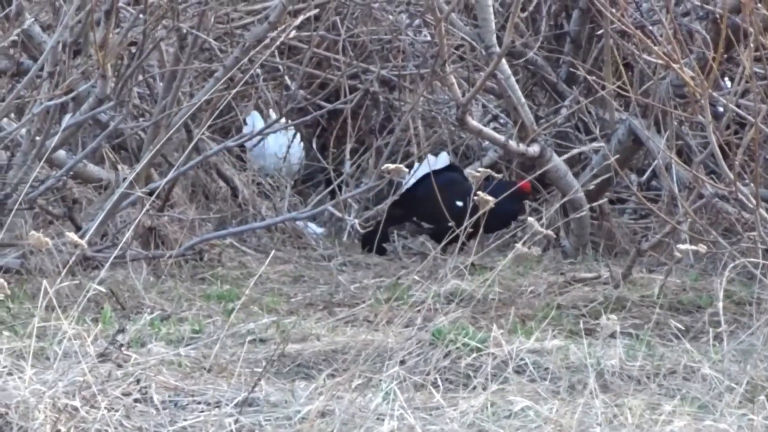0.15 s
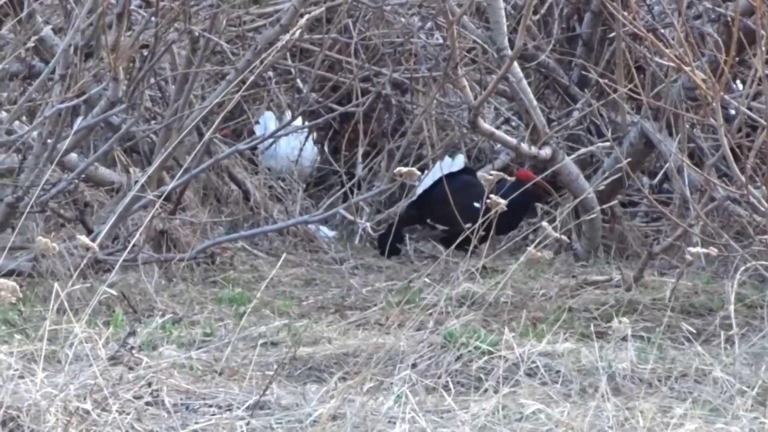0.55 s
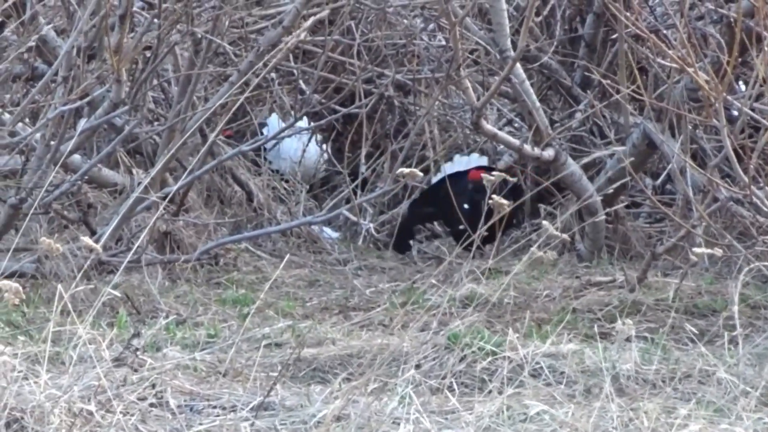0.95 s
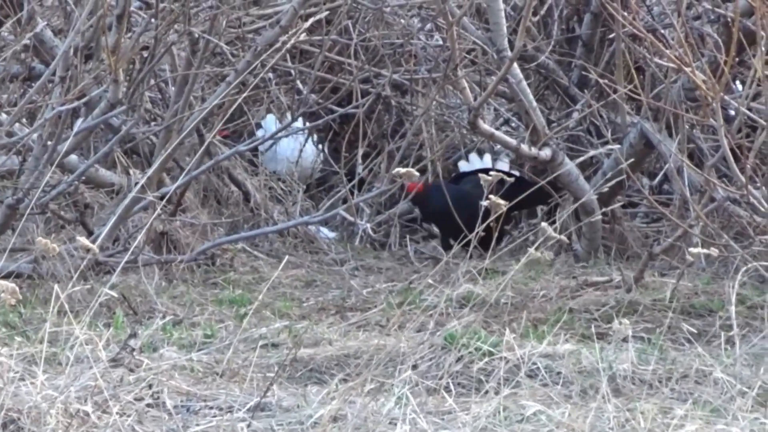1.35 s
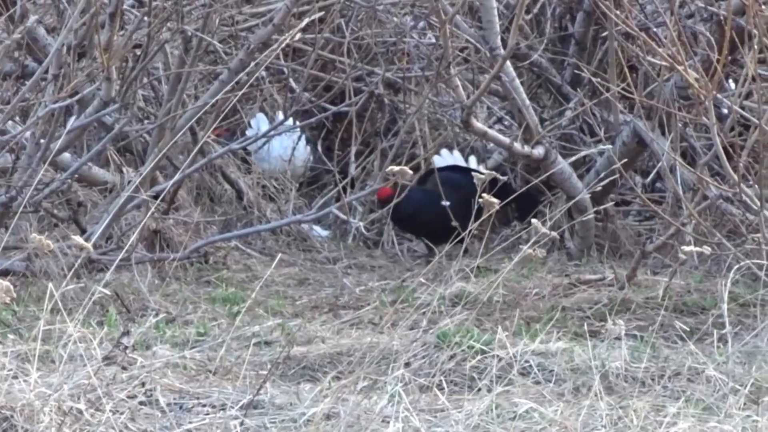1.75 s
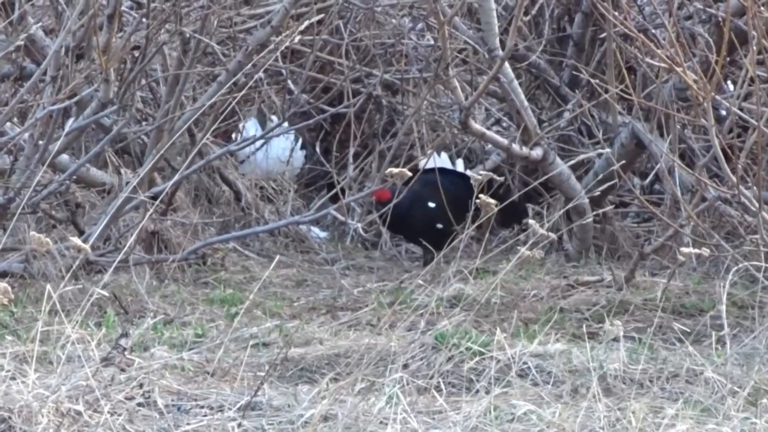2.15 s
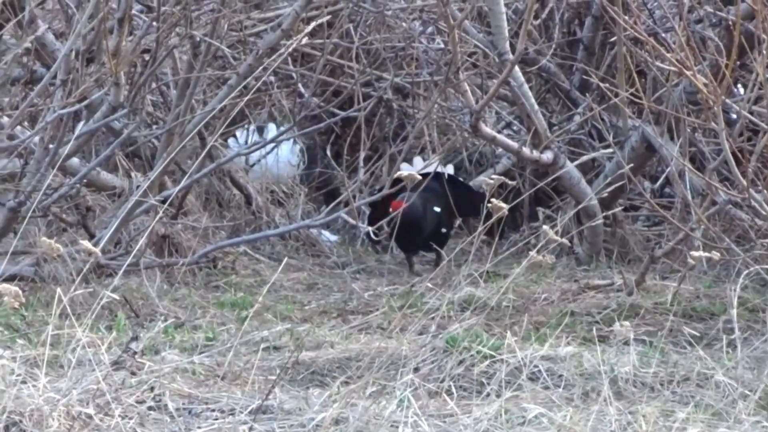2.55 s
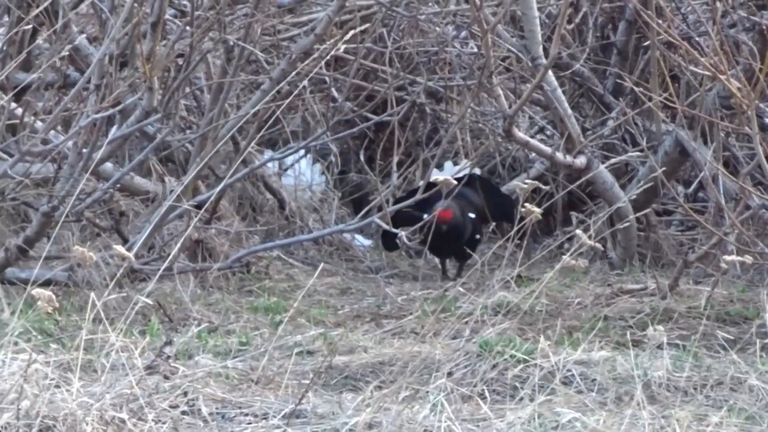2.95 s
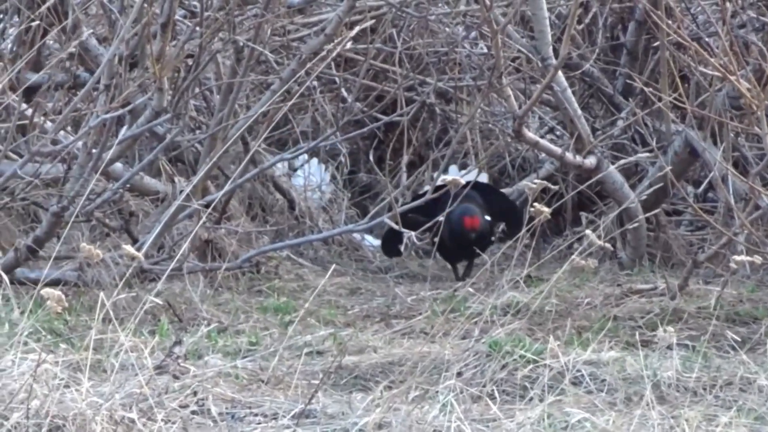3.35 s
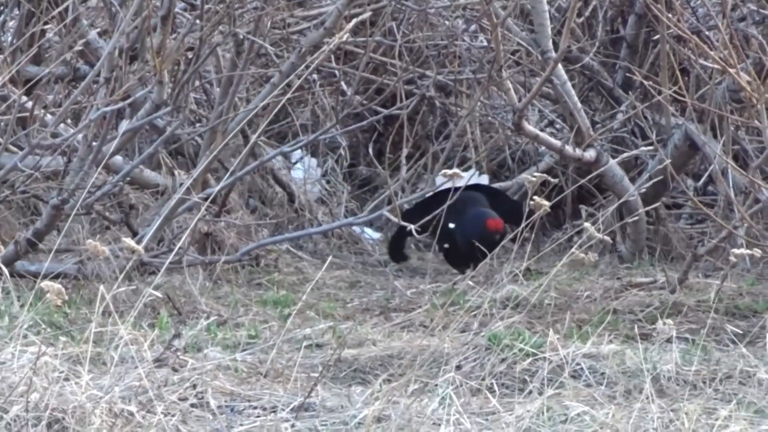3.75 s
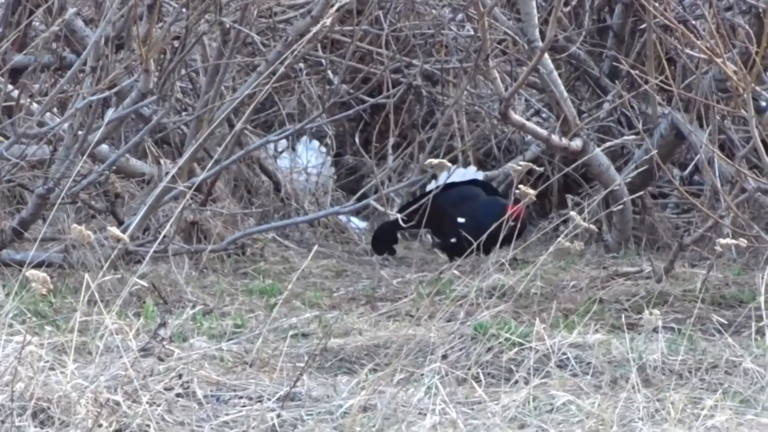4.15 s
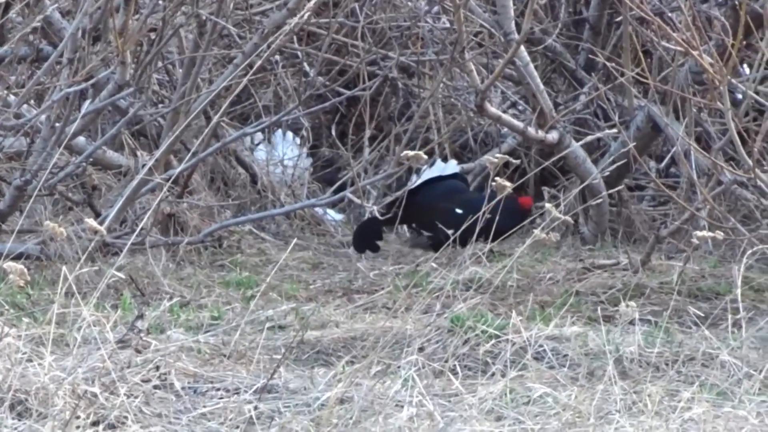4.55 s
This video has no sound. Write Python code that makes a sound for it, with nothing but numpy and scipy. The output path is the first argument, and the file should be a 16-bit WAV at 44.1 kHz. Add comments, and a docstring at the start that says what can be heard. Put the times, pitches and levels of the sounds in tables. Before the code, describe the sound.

Low wind rumble over open grass, a black grouse's bubbling coo swelling up, then thin bright songbird twitters and whistles answering from nearby shrubs.

```python
"""Wind and far chirps come first, with a camera jolt; then a male black grouse rolls and bubbles at the left.
Two songbirds join at the right: one with steep down-strokes, one with falling and held whistles.
All birds are gliding sine notes that the shrubs smear into short clouds of echoes.
Shaped noise makes the wind and the faint hiss, slow pressure swings make the two jolts,
decaying sines make the snaps of dry stalks, and a wavering sine makes the low-level hum."""
import sys
import numpy as np
from scipy import signal
from scipy.fft import rfft, irfft, next_fast_len
from scipy.io import wavfile
from scipy.ndimage import map_coordinates

SR = 44100
rng = np.random.default_rng(int(sys.argv[2]) if len(sys.argv) > 2 else 0)


def to_wav(sig):
    """Store sig (one row per channel, or 1-D mono) as 16-bit WAV at the path in sys.argv[1].

    Samples outside -1..1 are clipped; the rate is SR.
    """
    pcm = np.clip(np.atleast_2d(sig), -1, 1) * 32767
    pcm = np.round(pcm).astype(np.int16)
    wavfile.write(sys.argv[1], SR, pcm.T)  # frames by channels


N = 207925

# Note levels in dB are set before flutter, pan and echoes; pitches in Hz before the quaver.
# Grouse bubbles after the roll: start_s, length_s, middle_hz, glide_hz, peak_db
GROUSE_COOS = [(1.192, .057, 463.5, 27, -27), (1.533, 0.039, 509, 20, -32), (1.558, 0.043, 462, 60, -26.5),
               (1.645, .037, 508, 30, -28), (1.665, 0.054, 471.4, 75, -29),
               (1.719, 0.06, 453.5, -60, -34.5), (1.79, 0.061, 471, 55, -28.5), (1.84, 0.025, 426, -7, -31),
               (1.88, .025, 434, 15, -24.5), (1.924, 0.049, 426, 55, -28), (1.962, .032, 401, -10, -30),
               (1.985, 0.046, 493, -7, -28), (2.04, .06, 470, -20, -38), (2.085, 0.031, 437, 60, -23.5),
               (2.143, 0.039, 488, 41, -38.5), (2.192, 0.07, 438, -15, -29),
               (2.253, 0.065, 476, -17, -26.5), (2.308, 0.045, 431, -15, -28.5),
               (2.371, 0.047, 478, 3, -33.5), (2.395, .039, 482, 107, -30), (2.455, .048, 450.5, 44, -27.5),
               (2.489, 0.033, 510.3, 3, -25.5), (2.525, .046, 473, -43, -24),
               (2.572, 0.038, 456, -42, -26.5), (2.599, 0.023, 479, -12, -26.5),
               (2.659, .037, 442.5, -1, -22.5), (2.705, 0.047, 461, 57, -35),
               (2.871, 0.029, 447, -59, -32.5)]
# Grouse opening roll: strong beats swell, climb and slow down, with a soft low bubble between beats
ROLL_START_S, FIRST_GAP_S, GAP_GROWTH_S = .764, .07, .004  # growth is per beat
ROLL_DB, SWELL_DB, ROLL_HZ, CLIMB_HZ = -37.5, 3.5, 402.7, 11.6  # first beat and its change per beat
BEAT_LENGTH_S, OFFBEAT_LENGTH_S = .027, .051
OFFBEAT_SHARE, OFFBEAT_DB, OFFBEAT_HZ = .43, -8, -38.5  # share of the gap, then level and pitch against the beat
COO_RISE_HZ, COO_SCATTER_HZ = 15, 35  # glide over a roll or murmur note, and the spread of its chance part

# First songbird, steep down-strokes: start_s, length_s, top_hz, bottom_hz, peak_db, pickup_peak_db
DOWN_STROKES = [(1.391, 0.033, 4100, 3150, -47, -62), (1.704, .014, 3920, 2700, -45, -65),
                (1.729, 0.034, 4600, 2580, -33.5, -38), (1.887, .044, 4330, 2830, -33.5, -48),
                (1.961, .038, 4150, 2435, -36.5, -52), (2.088, 0.031, 4086, 2840, -33, -46),
                (2.219, .024, 3740, 2980, -42, -56), (2.269, .05, 4450, 2740, -35.5, -38),
                (2.347, 0.028, 4000, 2710, -36.5, -40), (2.424, 0.017, 4330, 3620, -36, -58),
                (2.443, 0.026, 3620, 2890, -39, -42)]
PICKUP_S, PICKUP_RISE_HZ = .014, 200  # the rising note ahead of a stroke
HEAD_SHARE, TAIL_DB = .66, -10.5  # loud first part of a stroke, then the tail against it
# First songbird, nearly level notes: start_s, length_s, middle_hz, peak_db
WARBLE_NOTES = [(1.832, .022, 3970, -46), (1.846, .031, 3300, -43), (1.866, 0.028, 4050, -43),
                (1.93, 0.021, 2765, -41.5), (1.95, .016, 3530, -44), (1.984, 0.014, 3200, -42),
                (2.035, .014, 3330, -46), (2.062, 0.017, 3700, -42.5), (2.192, .03, 3885, -47),
                (2.24, 0.016, 4100, -37), (2.298, 0.013, 3790, -35), (2.322, 0.031, 4060, -35),
                (2.428, 0.0093, 3650, -37), (2.462, 0.019, 3000, -43.5), (2.475, .016, 3530, -48),
                (2.49, 0.037, 3660, -44), (2.55, 0.051, 3655, -49), (2.61, 0.085, 3600, -53),
                (2.625, 0.077, 3130, -52), (2.68, .05, 4980, -64)]

# Second songbird, falling whistles: start_s, length_s, start_hz, peak_db
FALLING_WHISTLES = [(2.805, .042, 3793, -34), (2.926, 0.042, 3680, -32.5), (2.935, 0.042, 4000, -45.5),
                    (2.994, 0.033, 3645, -37.5), (3.082, 0.044, 3682, -31), (3.142, .058, 3570, -40),
                    (3.2, 0.044, 3610, -48), (3.222, 0.053, 3270, -43), (3.24, 0.025, 3600, -58),
                    (3.52, 0.027, 3430, -45), (3.59, 0.039, 3360, -45.5), (3.605, .045, 3220, -52)]
WHISTLE_FALL_HZ_PER_S = 4200
# Second songbird, held whistles: start_s, length_s, middle_hz, peak_db
HELD_WHISTLES = [(1.165, .045, 4110, -53), (1.335, .045, 3240, -56), (1.432, 0.033, 4015, -52),
                 (3.125, 0.023, 4080, -51.5), (3.495, .02, 4080, -51), (3.01, 0.022, 3900, -43.5),
                 (3.025, .045, 3420, -44), (3.34, 0.056, 3835, -46.5), (3.352, 0.046, 3410, -42),
                 (3.4, 0.035, 3790, -39.5), (3.405, 0.053, 3395, -47), (3.44, 0.07, 3133, -43.5),
                 (3.437, 0.029, 3800, -46), (3.48, .016, 3870, -48), (3.535, .054, 3810, -49.5)]

# Falling chirps of far birds: start_s, length_s, start_hz, peak_db
DISTANT_CHIRPS = [(.17, 0.13, 3460, -59.5), (.31, .028, 3180, -57), (.42, 0.052, 3290, -60),
                  (.695, .022, 3210, -55), (.83, 0.016, 2810, -55), (.91, 0.022, 2760, -57.5),
                  (4.245, 0.023, 3570, -56), (4.26, .017, 3020, -58), (4.515, .019, 3450, -58)]
FAR_FALL_HZ_PER_S = 6000
# Low far calls: start_s, length_s, start_hz, end_hz, peak_db
DISTANT_LOW_CALLS = [(4.55, 0.098, 1358, 1294, -53), (4.665, .045, 1290, 1250, -57)]

# Dry stalks snapping: start_s, pitch_hz, level_db
STALK_SNAPS = [(2.517, 5570, -37), (3.845, 12000, -50), (3.928, 13500, -37), (4.525, 2600, -37)]

# Camera swinging on its mount: crest_s, level_db
CAMERA_JOLTS = [(.33, -5.3), (3.405, -4.8)]
# Pressure pulses within one jolt: from_crest_s, width_s, share (signed, no unit)
JOLT_PULSES = [(-.068, .022, -.7), (0, .026, 1), (.11, .06, -.35)]
# Colour of the brush on the camera body: pitch_hz, relative_level_db (per Hz)
BRUSH_COLOUR = [(60, -40), (120, -10), (270, 3), (400, -1.5), (700, -60), (2000, -120)]

# Wind strength over time: time_s, level_db
WIND_STRENGTH = [(0, -23.5), (.38, -18.5), (.65, -25), (1.0, -21.5), (1.69, -19.5), (1.86, -16),
                 (1.98, -24.5), (3.19, -20), (3.36, -20), (3.53, -21.5), (4.28, -20), (4.71, -22.5)]
# Colour of the buffeting: pitch_hz, relative_level_db (per Hz)
WIND_COLOUR = [(1, -17), (3, 7), (16, 3.5), (30, 0), (45, -7.5), (62, -18), (110, -26.5), (220, -36.5),
               (400, -46.5), (1500, -110)]
# Tilt of the buffeting between the ports: pitch_hz, left_over_right_db
WIND_LEAN = [(5, 0), (11, -4), (18, 0), (35, 5), (70, 1)]
# Likeness of the two ports in wind before the lumps: pitch_hz, correlation (-1 to 1)
WIND_LIKENESS = [(4, 0.62), (13, 0.17), (32, -0.5), (80, -0.019)]
PORT_LIMIT = .63  # ceiling of the diaphragm swing, full scale = 1

# Colour of the distant rush and microphone hiss: pitch_hz, relative_level_db (per Hz)
AIR_COLOUR = [(35, -8), (60, 0.5), (163, -4), (248, -7.5), (413, -8.5), (628, -16), (705, -18.5),
              (1550, -25), (1960, -28.5), (15500, -36.5)]
# Likeness of left and right in the air: pitch_hz, correlation (-1 to 1)
AIR_LIKENESS = [(80, -.3), (200, .1), (600, .3), (1500, .12), (6000, .02)]
AIR_LEVEL_DB = -39.5
# Centre of the wavering hum: pitch_hz, peak_db
HUM_TONE = (689, -56.5)

INPUT_OFFSET, BAND_LIMIT_HZ = -.01, 15780


def grouse():
    """The grouse's low gliding notes: an opening roll, loud bubbles and a soft murmur among them."""
    murmur = chatter(count=16, from_s=1.25, to_s=2.95, mean_s=.04, low_hz=430, high_hz=490, db=-41)
    coos = gliding([*roll(count=6), *murmur], COO_RISE_HZ, COO_SCATTER_HZ)
    coos += [(s, length, hz - glide / 2, hz + glide / 2, db) for s, length, hz, glide, db in GROUSE_COOS]
    return song(coos, pan_db=2.4, round_top=1.2, quaver_hz=9, flutter_db=1, rate=70,
                twig_db=-20, echo_db=-13, t60=.3, delay=.02)


def roll(count):
    """Beats that swell, climb and slow down, with softer, lower offbeats inside the gaps."""
    k = np.arange(count)
    gap = FIRST_GAP_S + GAP_GROWTH_S * k
    start = ROLL_START_S + np.cumsum(gap) - gap
    hz, db = ROLL_HZ + CLIMB_HZ * k, ROLL_DB + SWELL_DB * k
    beats = [(s, BEAT_LENGTH_S, f, d) for s, f, d in zip(start, hz, db)]
    off_start = start + OFFBEAT_SHARE * gap
    offbeats = [(s, OFFBEAT_LENGTH_S, f, d)
                for s, f, d in zip(off_start, hz + OFFBEAT_HZ, db + OFFBEAT_DB)]
    return beats + offbeats[:-1]


def first_songbird():
    """Steep down-strokes and nearly level notes, with soft chance twitter among them."""
    twitter = chatter(count=20, from_s=1.88, to_s=2.56, mean_s=.0156, low_hz=2855, high_hz=3926, db=-49)
    notes = strokes() + gliding(WARBLE_NOTES, scatter_hz=60)
    notes += gliding(twitter, rise_hz=-150, scatter_hz=453)
    return song(notes, pan_db=-2.2, round_top=.6, quaver_hz=62, flutter_db=2.3, rate=260,
                twig_db=-7, echo_db=-6.5, t60=.6, delay=.006)


def strokes():
    """A rising pick-up, then one straight fall in pitch: loud head, soft tail."""
    notes = []
    for s, length, top_hz, bottom_hz, db, pickup_db in DOWN_STROKES:
        head = HEAD_SHARE * length
        knee_hz = top_hz + HEAD_SHARE * (bottom_hz - top_hz)
        notes += [(s - PICKUP_S, PICKUP_S, top_hz - PICKUP_RISE_HZ, top_hz, pickup_db),
                  (s, head, top_hz, knee_hz, db),
                  (s + head, length - head, knee_hz, bottom_hz, db + TAIL_DB)]
    return notes


def second_songbird():
    """Whistles that sag at one speed and others nearly held, with soft chance notes among and after them."""
    above = chatter(count=14, from_s=2.96, to_s=3.28, mean_s=.0139, low_hz=3820, high_hz=4220,
                    db=-57, spread_db=2)
    late = chatter(count=12, from_s=3.45, to_s=3.82, mean_s=.019, low_hz=3220, high_hz=4200, db=-60)
    notes = sagging([*FALLING_WHISTLES, *late], WHISTLE_FALL_HZ_PER_S)
    notes += gliding(above, rise_hz=-120, scatter_hz=200)
    notes += gliding(HELD_WHISTLES, rise_hz=-21, scatter_hz=25)
    return song(notes, pan_db=-2.6, round_top=.38, quaver_hz=25, flutter_db=1.2, rate=160,
                twig_db=-9, echo_db=-8, t60=.7, delay=.03)


def far_birds():
    """Faint falling chirps, chance peeps and two low calls near the centre."""
    peeps = chatter(count=10, from_s=.29, to_s=4.6, mean_s=.019, low_hz=2760, high_hz=3600, db=-63)
    notes = sagging([*DISTANT_CHIRPS, *peeps], FAR_FALL_HZ_PER_S) + DISTANT_LOW_CALLS
    return song(notes, pan_db=.5, round_top=.49, quaver_hz=35.2, flutter_db=1, rate=120,
                twig_db=-6, echo_db=-5.5, t60=.4, delay=.0085)


def song(notes, pan_db, round_top, quaver_hz, flutter_db, rate, twig_db, echo_db, t60, delay):
    """Gliding sines, unsteady in pitch and level; the shrubs return a new dying cloud of echoes for each note."""
    out = np.zeros((2, N + 2 * SR))
    lag = np.arange(SR // 2) / SR
    quaver = quaver_hz * wobble(rate)
    flutter = amp(flutter_db * wobble(rate))
    for s, length, start_hz, end_hz, db in notes:
        at = round(s * SR)
        u = np.arange(int(length * SR)) / int(length * SR)
        hz = start_hz + (end_hz - start_hz) * u + quaver[at:][:len(u)]
        envelope = amp(db) * np.sin(np.pi * u) ** round_top * flutter[at:][:len(u)]
        note = envelope * np.sin(2 * np.pi * np.cumsum(hz) / SR + rng.uniform(0, 2 * np.pi))
        heard = signal.fftconvolve(note[None], shrubs(lag, twig_db, echo_db, t60, delay), axes=1)
        out[:, at:][:, :heard.shape[1]] += heard
    return out[:, :N] * amp([[pan_db / 2], [-pan_db / 2]])  # positive pan leans left


def shrubs(lag, twig_db, echo_db, t60, delay):
    """The direct note, a quick blur from near twigs and ground, and a later decaying cloud of echoes."""
    build_up = 1 - np.exp(-(lag / delay) ** 2)
    echoes = rng.standard_normal((3, len(lag))) * amp(-60 * lag / t60) * build_up
    # part of the echoes reaches both ears alike
    echoes = (1.25 * echoes[:2] + echoes[2]) / np.linalg.norm(echoes[2])
    twigs = rng.standard_normal(len(lag)) * amp(-60 * lag / .055)
    cloud = amp(echo_db) * echoes + amp(twig_db) * twigs / np.linalg.norm(twigs)
    cloud[:, 0] = 1  # the direct sound
    return cloud


def gliding(rows, rise_hz=0, scatter_hz=0):
    """Notes given by their middle pitch, each gliding by a set rise plus a chance part."""
    rises = rise_hz + scatter_hz * rng.standard_normal(len(rows))
    return [(s, length, hz - rise / 2, hz + rise / 2, db)
            for (s, length, hz, db), rise in zip(rows, rises)]


def sagging(rows, hz_per_s):
    """Notes that fall at one speed from their start pitch."""
    return [(s, length, hz, hz - hz_per_s * length, db) for s, length, hz, db in rows]


def chatter(count, from_s, to_s, mean_s, low_hz, high_hz, db, spread_db=3):
    """Soft notes spread loosely over a span, with chance length, pitch and level."""
    u = rng.random((count, 4))
    start = from_s + (to_s - from_s) * (np.arange(count) + u[:, 0]) / count
    length = mean_s * (.5 + u[:, 1])
    hz = low_hz + (high_hz - low_hz) * u[:, 2]
    return np.c_[start, length, hz, db + spread_db * (2 * u[:, 3] - 1)]


def stalks():
    """Dry stalks snap: tiny clicks, each a sine that dies within milliseconds."""
    out, t = np.zeros(N), np.arange(SR // 100) / SR
    for s, hz, db in STALK_SNAPS:
        decay = amp(db - 60 * t / .0038)
        out[round(s * SR):][:len(t)] += decay * np.sin(2 * np.pi * hz * t)
    return out


def camera():
    """Each jolt pulls back, pushes and sags: a slow pressure swing on both ports, led by a dull brush on the body."""
    t = np.arange(N) / SR

    def bell(at, width):
        return np.exp(-((t - at) / width) ** 2 / 2)

    swing = sum(amp(db) * share * bell(s + at, width)
                for s, db in CAMERA_JOLTS for at, width, share in JOLT_PULSES)
    body = unit(filtered(rng.standard_normal(N), lambda hz: amp(along(BRUSH_COLOUR, hz))))
    return swing + amp(-42) * body * sum(bell(s - .07, .03) for s, _ in CAMERA_JOLTS)


def wind():
    """Wind buffets the two microphone ports: lumpy low noise, each port with its own colour."""
    s, db = np.transpose(WIND_STRENGTH)
    lumps = amp(2.5 * np.array([wobble(7.14), wobble(7)]))
    ports = filtered(rush(WIND_COLOUR, WIND_LIKENESS),
                     lambda hz: amp(np.outer([.5, -.5], along(WIND_LEAN, hz))))
    strength = amp(np.interp(np.arange(N) / SR, s, db))
    return strength * unit(lumps * ports)


def air():
    """Distant rush and hiss breathe a little; a faint hum wavers in level and pitch."""
    hz, db = HUM_TONE
    hum_level = amp(db + 1.8 * wobble(10))
    hum = hum_level * np.sin(2 * np.pi * np.cumsum(hz + 2.24 * wobble(8)) / SR)
    return amp(AIR_LEVEL_DB + .082 * wobble(2.26)) * rush(AIR_COLOUR, AIR_LIKENESS) + hum


def rush(spectrum, alike):
    """Stereo noise of rms 1, mixed from mid and side so that its channels are partly alike."""
    def colour(hz):
        turn = np.arccos(np.clip(along(alike, hz), -1, 1)) / 2
        return amp(along(spectrum, hz)) * [np.cos(turn), np.sin(turn)]

    mid, side = filtered(rng.standard_normal((2, N)), colour)
    return unit(np.array([mid + side, mid - side]))


def filtered(x, response):
    """Sound shaped by a gain at each frequency."""
    m = next_fast_len(N + SR)
    return irfft(rfft(x, m) * response(np.fft.rfftfreq(m, 1 / SR)), m)[..., :N]


def wobble(rate):
    """A smooth random curve through chance points, rate points a second."""
    return map_coordinates(rng.standard_normal(int(N * rate / SR) + 4), [np.arange(N) * rate / SR])


def along(points, hz):
    """Values of a frequency table, read on a log axis."""
    f, v = np.transpose(points)
    return np.interp(np.log(hz + .1), np.log(f + .1), v)  # .1 keeps 0 Hz finite


def amp(db):
    """Decibels to gain."""
    return 10 ** (np.asarray(db) / 20)


def unit(x):
    """Sound scaled to rms 1."""
    return x / np.sqrt(np.mean(x ** 2) + 1e-20)


def scene():
    """All sources at the two ports; the diaphragm's slow swing under wind and jolts levels off at its crests."""
    birds = grouse() + first_songbird() + second_songbird() + far_birds()
    push = wind() + camera()
    push = push / (1 + np.abs(push / PORT_LIMIT) ** 8) ** (1 / 8)
    return birds + push + air() + stalks()


def record(dry):
    """The input stage sits slightly off zero, and a steep filter stops all above the band limit."""
    # mirrored ends let the sound run on past both edges of the filter
    x = np.pad(dry + INPUT_OFFSET, ((0, 0), (SR // 4, SR // 4)), "reflect")
    m = next_fast_len(x.shape[1])
    passed = np.fft.rfftfreq(m, 1 / SR) < BAND_LIMIT_HZ
    return irfft(rfft(x, m) * passed, m)[:, SR // 4:][:, :N]


dry = scene()
out = record(dry)
to_wav(out)
```